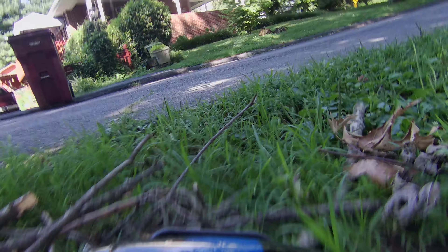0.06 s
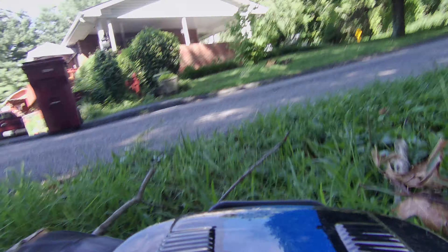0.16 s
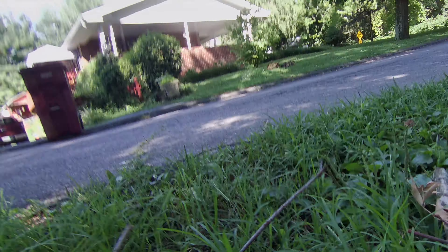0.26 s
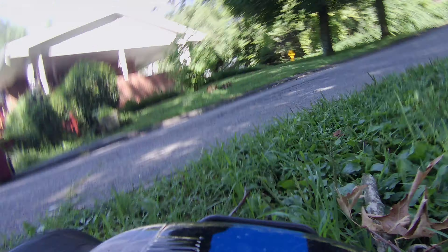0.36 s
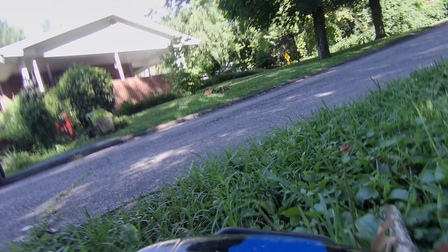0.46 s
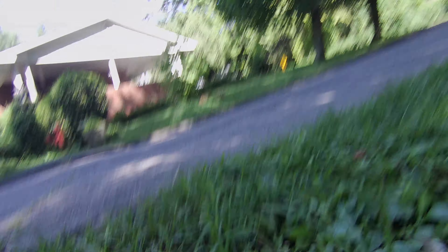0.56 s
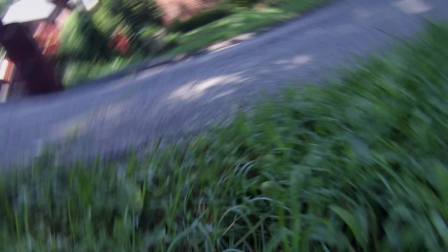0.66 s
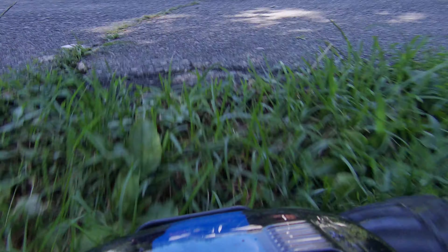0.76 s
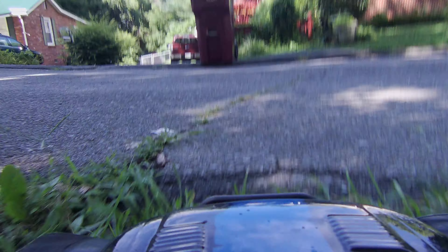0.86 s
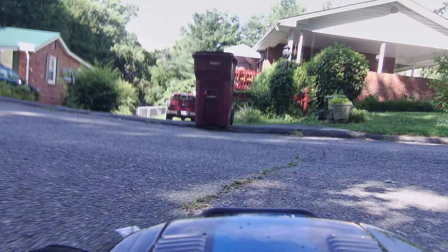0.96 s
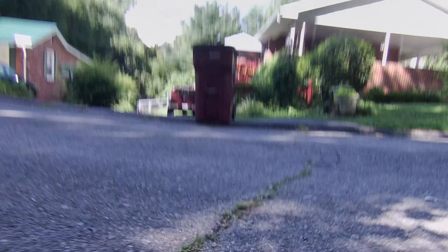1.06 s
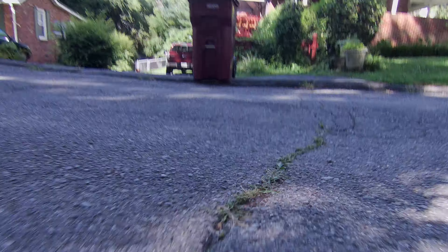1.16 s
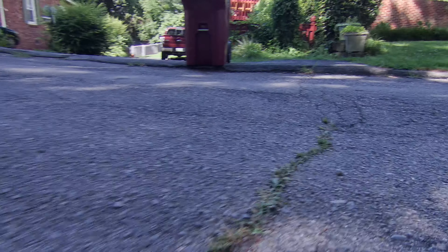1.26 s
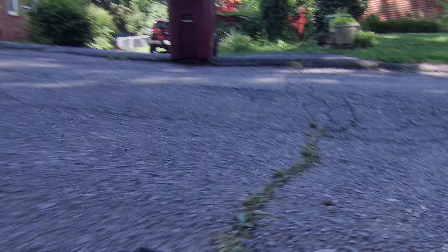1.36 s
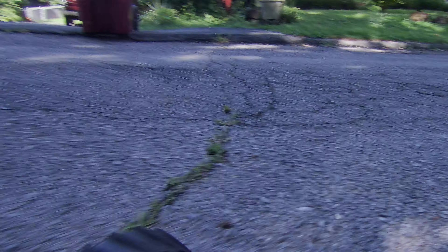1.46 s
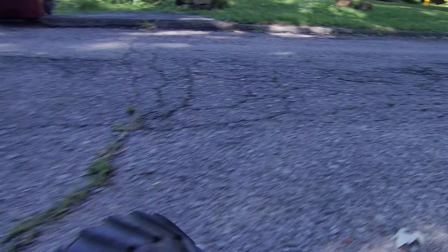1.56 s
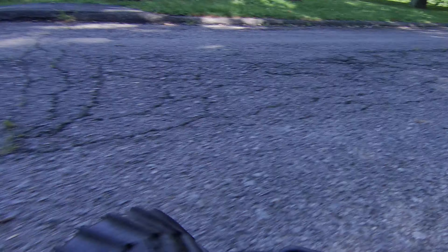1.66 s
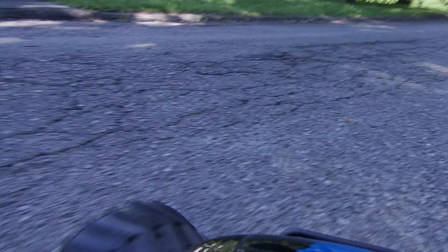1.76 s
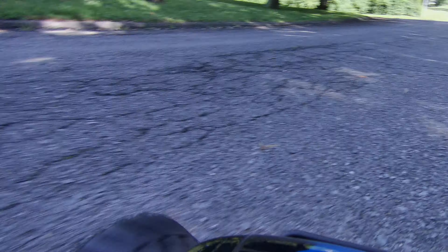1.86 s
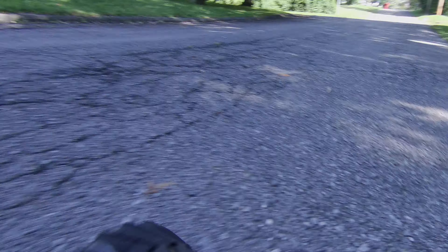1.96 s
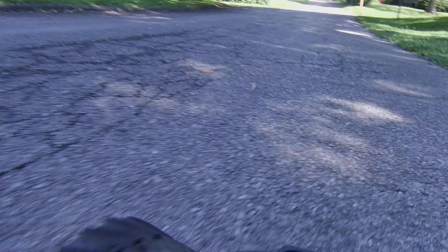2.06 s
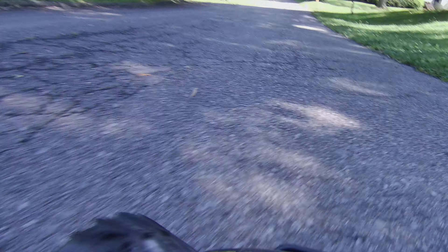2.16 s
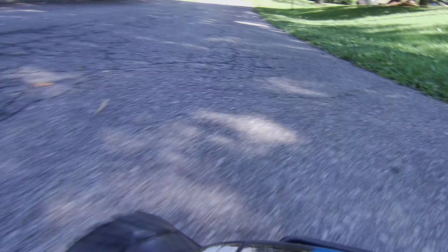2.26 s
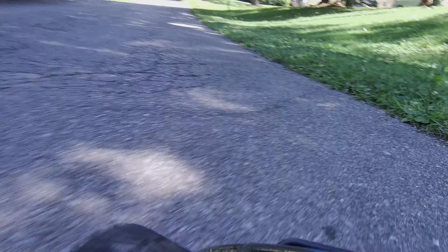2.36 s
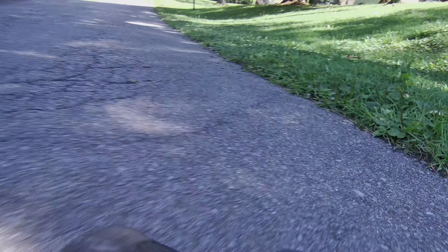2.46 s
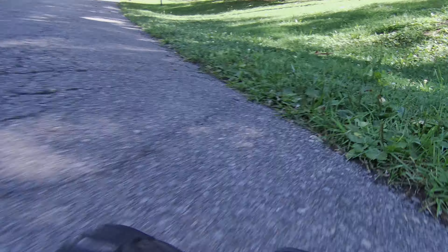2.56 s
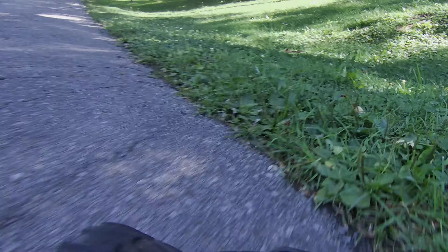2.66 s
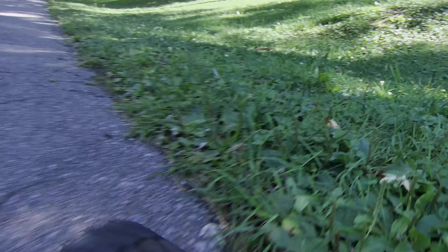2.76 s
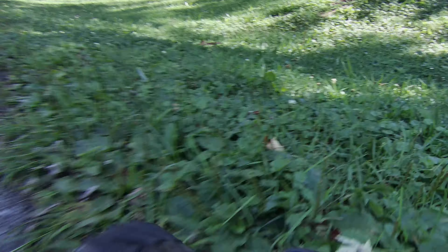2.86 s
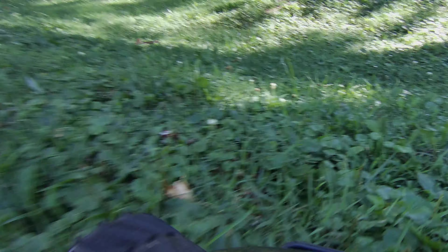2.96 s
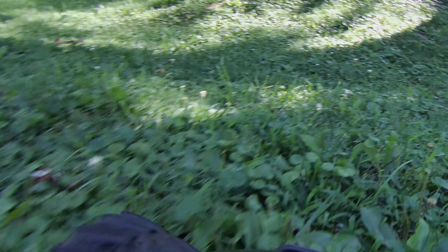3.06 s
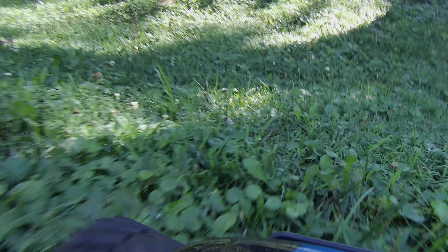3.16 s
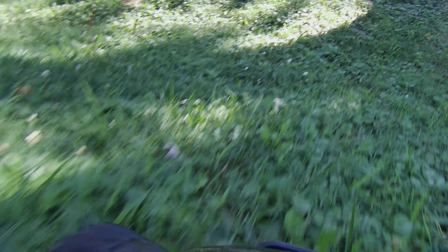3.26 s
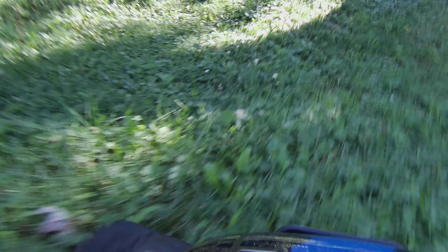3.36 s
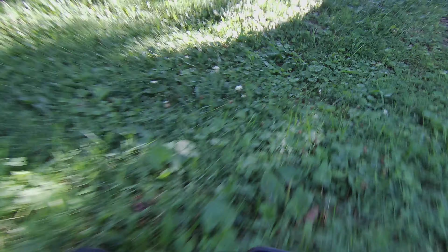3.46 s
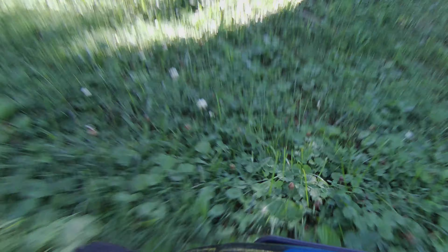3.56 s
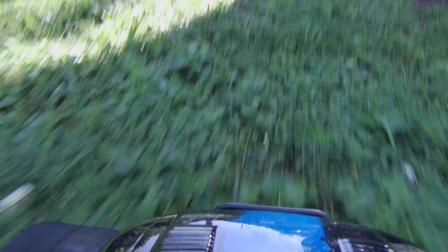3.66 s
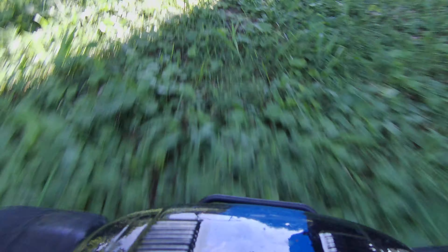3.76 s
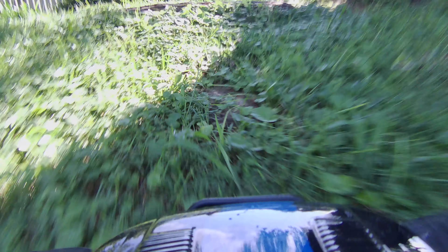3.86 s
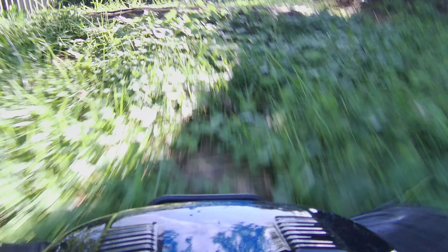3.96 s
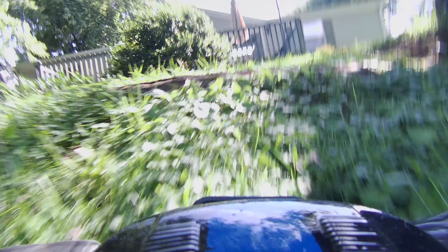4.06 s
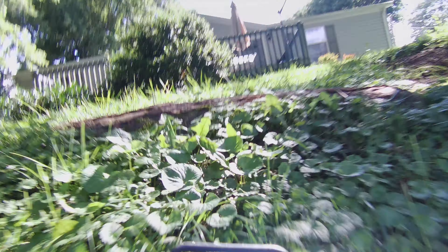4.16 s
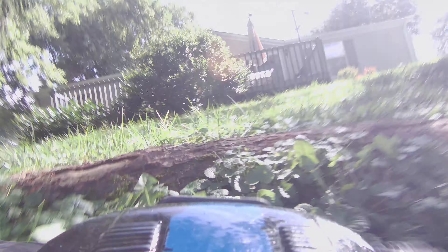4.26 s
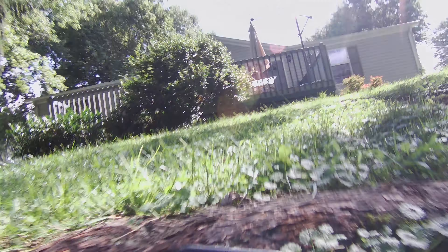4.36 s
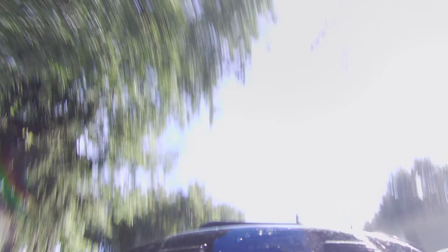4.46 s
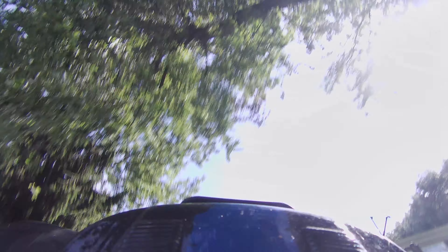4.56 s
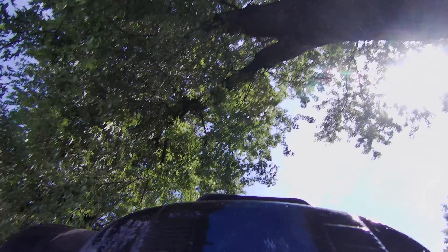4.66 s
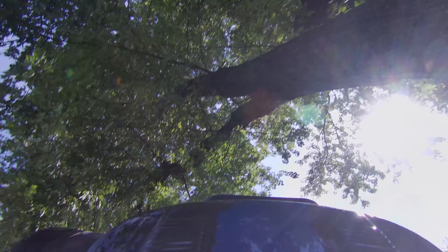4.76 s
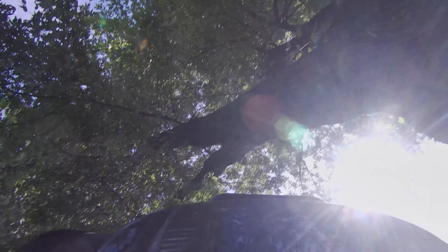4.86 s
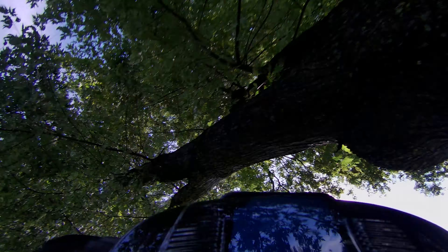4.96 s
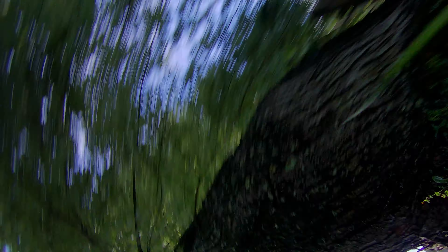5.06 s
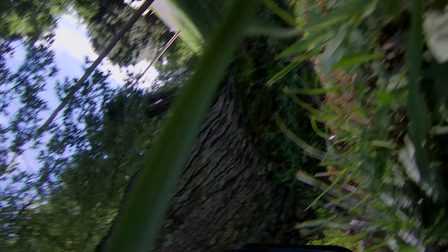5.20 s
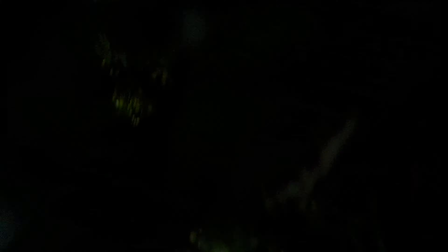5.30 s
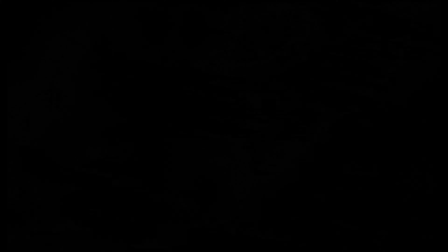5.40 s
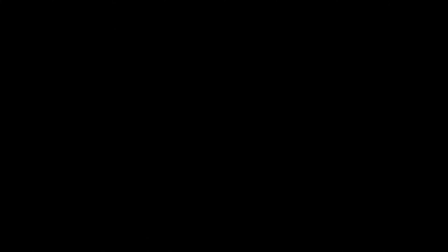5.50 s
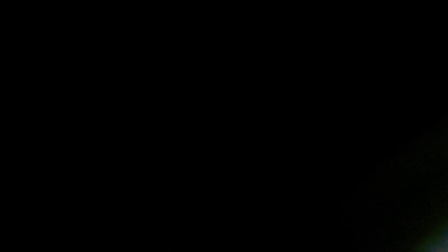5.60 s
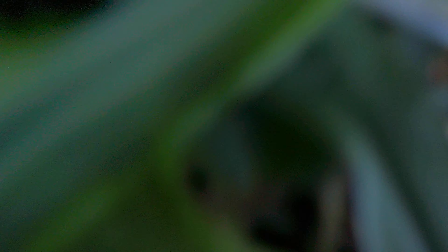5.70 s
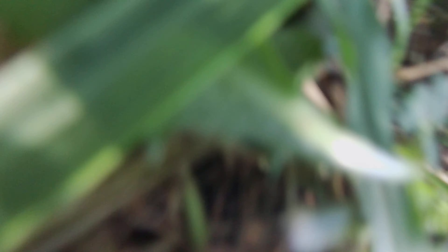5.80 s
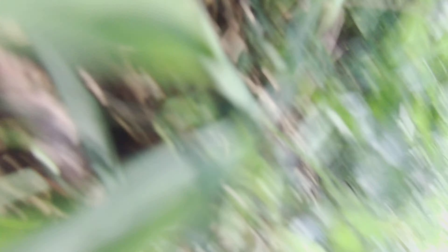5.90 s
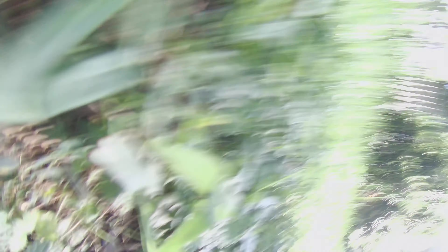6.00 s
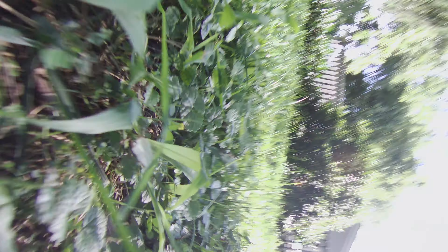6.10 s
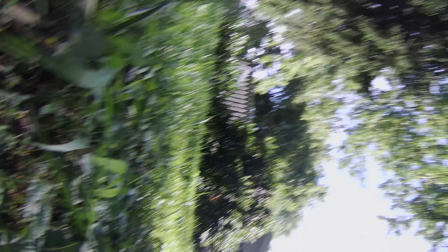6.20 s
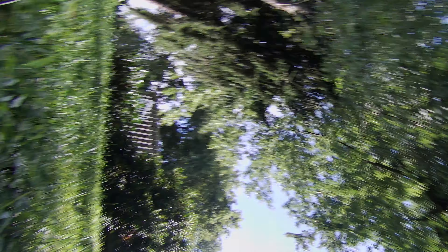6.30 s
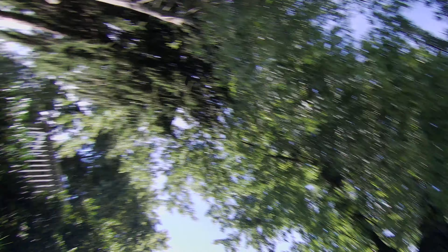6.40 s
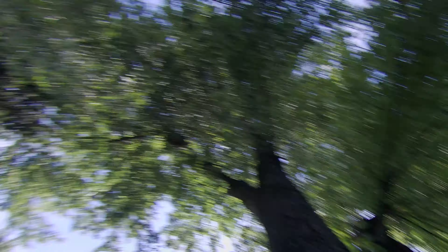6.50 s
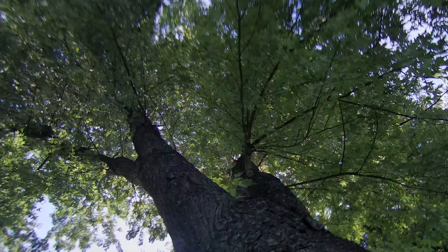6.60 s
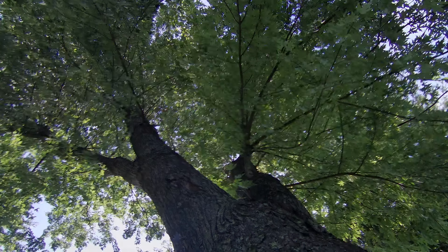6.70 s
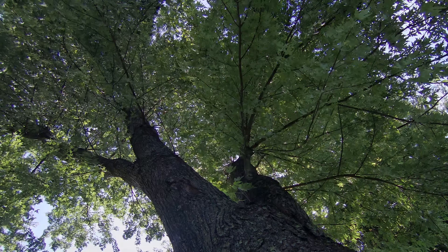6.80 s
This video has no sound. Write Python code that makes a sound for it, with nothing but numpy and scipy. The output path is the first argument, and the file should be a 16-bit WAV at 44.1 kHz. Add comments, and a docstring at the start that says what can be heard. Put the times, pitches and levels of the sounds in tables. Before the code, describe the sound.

Very close, dry sound carried through the plastic chassis of a small radio-controlled truck, with hollow midrange ringing and little bass. From 0 s the gear whine falls and recovers, wobbling, amid buzzing rattle, clacks and short low groans. Knocks crowd in from 0.5 s, with a very hard crack at 0.8 and another at 1.0. On pavement the whine leaps up, then sinks; rattling eases, with a tread hum around 1.5 and light knocks at 1.7. Throttle bursts at 1.8, 2.25 and 3.2 sweep upward into rasp. Over the lawn from 3.4 the motor runs high and rough, with bangs at 3.95, 4.1-4.3 and 4.6. The heaviest crash comes at 5.15-5.25; drive stops near 5.35 with a burst of clatter and grass swish. A knock at 5.5 precedes sparse tumbling thuds, clacks and ticks at 5.8, 5.95, 6.1, 6.25 and 6.65, over near quiet.

```python
"""A small radio-controlled truck races over the ground, bounces and tumbles in the grass, heard from its chassis.
Its loose parts rattle and grass brushes past: random clicks played into the ringing of a plastic case.
The gears whine with a wobbling tone that follows motor speed, and smear into noise when fast.
Bursts of noise make the knocks and ticks; hums, groans, a thin whistle and a faint rumble lie below.
A fast limiter catches the hardest knocks."""
import sys
import numpy as np
from scipy import signal
from scipy.fft import rfft, irfft, next_fast_len
from scipy.io import wavfile
from scipy.ndimage import uniform_filter1d, minimum_filter1d

SR = 44100
rng = np.random.default_rng(int(sys.argv[2]) if len(sys.argv) > 2 else 0)


def unload_wav(signal):
    """Save mono or channel-first audio to the path in sys.argv[1] as 16-bit WAV at rate SR, clipped to [-1, 1]."""
    wavfile.write(
        sys.argv[1],
        SR,
        np.round(np.clip(np.atleast_2d(signal).T, -1, 1) * 32767).astype(np.int16),
    )


N = 301644
T = np.arange(N) / SR


def amp(db):
    """Turns decibels into a gain."""
    return 10 ** (np.asarray(db) / 20)


def unit(x):
    """Scales a sound to an average (rms) level of 1."""
    return x / np.sqrt(np.mean(x ** 2) + 1e-20)


def curves(rows):
    """Joins the points of every table column by straight lines in time."""
    times, *columns = np.transpose(rows)
    return [np.interp(T, times, column) for column in columns]


def add(mix, start, sound):
    """Adds a sound to the mix at a start time in seconds."""
    part = mix[max(round(start * SR), 0):][:len(sound)]
    part += sound[:len(part)]


def wander(hz):
    """Random drift of rms 1 that moves no faster than about hz."""
    size = next_fast_len(N, True)
    f = np.fft.rfftfreq(size, 1 / SR)
    spectrum = rfft(rng.standard_normal(size)) / (1 + (f / hz) ** 4)
    return unit(irfft(spectrum, size)[:N])


def narrow(hz, width_hz):
    """Noise of rms 1 in a narrow band that follows hz."""
    phase = 2 * np.pi * np.cumsum(hz * np.ones(N)) / SR
    return unit(wander(width_hz / 2) * np.cos(phase) + wander(width_hz / 2) * np.sin(phase))


def clicks(per_s, spread_db):
    """A random train of small impacts, a few of them large."""
    size = amp(spread_db * np.minimum(rng.exponential(1, N), 4))
    happens = rng.random(N) < per_s / SR
    return unit(size * rng.choice([-1, 1], N) * happens)


def steady(x, size=1500):
    """Evens out the level over a few hundredths of a second and keeps the faster grain."""
    power = uniform_filter1d(uniform_filter1d(x ** 2, size), size // 2)
    return x / np.sqrt(abs(power) + 1e-9)


def patchy(x, patchy_db):
    """Different parts rattle from moment to moment, so the tone colour keeps shifting."""
    z = signal.stft(x, nperseg=512)[2]
    patches = uniform_filter1d(rng.standard_normal(z.shape), size=5, axis=0)  # smooth in pitch
    patches = unit(uniform_filter1d(patches, size=4, axis=1))  # and in time
    return unit(signal.istft(z * amp(patchy_db * patches), nperseg=512)[1][:N])


def swell(start, length, attack, release):
    """A gain that rises, holds for its length, then dies away; times in seconds."""
    return np.clip((T - start) / attack, 0, 1) * np.exp(-np.maximum(T - start - length, 0) / release)


def swells(rows, attack, release):
    """One gain curve for each level column of a table that starts with (start, length)."""
    return sum(amp(dbs)[:, None] * swell(start, length, attack, release) for start, length, *dbs in rows)


# what chassis and case ring with, or swallow where negative:
# (frequency [Hz], width [Hz], level above the broad shape [dB])
CASE_RESONANCES = [(338, 155, -5.5), (583.4, 38, 6.5), (708, 85, 6), (910, 9.7, 1), (1119, 16, 6),
                   (1402.5, 46, -22.5), (1432, 74, 12), (2550, 120, 5), (2920, 350, 1), (3440, 590, 1),
                   (5450, 680, 6), (7300, 950, 6.5), (10400, 3400, 2)]


def case(shape, size=4096):
    """The ringing after one tap, of energy 1: a broad shape with the resonances of the case on it."""
    f = np.fft.rfftfreq(size, 1 / SR)
    hz, db = np.transpose(shape)
    db = np.interp(np.log(f + 1), np.log(hz), db)
    db = db + sum(peak_db / (1 + (2 * (f - center) / width) ** 2) for center, width, peak_db in CASE_RESONANCES)
    log_gain = np.log(amp(np.r_[db, db[-2:0:-1]]))
    # minimum phase: the ring starts at once, with nothing before the tap
    ring = np.fft.ifft(np.exp(np.conj(signal.hilbert(log_gain)))).real[:size // 2]
    return ring / np.linalg.norm(ring)


def through(x, ring):
    """Plays a sound into the ringing of a body."""
    return signal.oaconvolve(x, ring)[:len(x)]


def strike(ring, length, evenness, punch=0.16, size=4096):
    """A burst of contact chatter: a hard first contact, an even ring for its length, then it dies away."""
    t = np.arange(size) / SR
    sound = unit(through(rng.standard_normal(2 * size), ring)[size:])
    power = uniform_filter1d(abs(signal.hilbert(sound)) ** 2, size=30)
    loudness = np.sqrt(abs(power) + 1e-6)
    hold = (1 - np.exp(-t / .0003)) / np.sqrt(1 + (t / length) ** 6)
    first_contact = (1 + punch * np.exp(-3 * t / length)) / (1 + punch / 3)
    return unit(sound / loudness ** np.clip(evenness, 0, 1)) * hold * first_contact


# how hard the ground shakes the rolling chassis: (time [s], level [dB])
GROUND_SHAKING = [(0, -19), (.78, -21), (.84, -21.5), (1.16, -25), (1.46, -22.5), (1.58, -20), (1.8, -27.5),
                  (1.88, -17.5), (2.1, -22), (2.55, -22), (3.1, -24.5), (3.19, -26.5), (3.3, -28),
                  (3.6, -19.5), (4.3, -25), (4.7, -19.5), (4.86, -26), (5.14, -19), (5.35, -23),
                  (5.68, -36), (6.4, -31.5), (6.47, -46.5), (6.63, -43.5), (6.83, -33)]
# bursts of throttle; rasp and wheel-spin hiss are as at the gearbox resonance and grow with motor speed:
# (start [s], length [s], gear whine [dB], gear rasp [dB], wheel-spin hiss [dB])
THROTTLE_BURSTS = [(-.03, 0.89, -25.5, -30, -43.5), (0.862, 0.23, -31.5, -37, -55.5),
                   (1.828, 0.14, -22, -34.5, -54), (2.239, 0.25, -23.5, -34, -50),
                   (3.21, 0.18, -22, -34, -51), (3.384, 1.32, -29, -37, -53.5),
                   (4.718, 0.63, -38, -42, -58.5)]
# bouts of rattling as the truck bounces, then rolls over in the grass:
# (start [s], length [s], shaking [dB], rasp [dB], grass swish [dB])
BOUNCES = [(.13, 0.16, -16, -27.5, -50), (.39, 0.2, -18.5, -34, -52), (1.18, 0.037, -21.5, -34, -52),
           (1.34, 0.042, -35, -43, -57), (1.832, 0.033, -23, -49, -53), (1.995, .025, -21, -29.5, -49),
           (3.235, 0.056, -21.5, -42, -53), (3.0, .14, -24.5, -52, -60), (3.48, 0.076, -18, -37, -49),
           (3.64, .06, -36, -38, -46), (4.35, .05, -20.5, -33, -53), (4.455, 0.086, -17.5, -34, -50),
           (4.93, 0.056, -20.5, -50, -58), (5.364, 0.059, -15, -28.5, -38), (5.44, 0.25, -36, -46, -49.5),
           (5.715, .13, -26, -39, -40), (5.85, 0.082, -30, -40, -50.5), (5.99, 0.085, -20, -36, -61),
           (6.12, 0.069, -20, -35, -71), (6.26, 0.13, -22.5, -43.5, -66), (6.67, .13, -24.5, -35.5, -69)]
THROTTLE_ATTACK_S, THROTTLE_RELEASE_S = 0.0097, 0.012
BOUNCE_ATTACK_S, BOUNCE_RELEASE_S = 0.0074, 0.019
THROTTLE_SHAKE_DB, THROTTLE_DB_PER_OCTAVE = 2.5, 4
# levels relative to the ground shaking, and the hiss that never stops
RASP_RE_SHAKE_DB, SWISH_RE_SHAKE_DB, COAST_WHINE_RE_SHAKE_DB, STILL_HISS_DB = -22, -44.5, -20.5, -67


def effort():
    """Throttle (about 0 to 1) and the gains that ground, throttle and bounces give to each sound."""
    ground = amp(curves(GROUND_SHAKING)[0])
    throttle = sum(swell(start, length, THROTTLE_ATTACK_S, THROTTLE_RELEASE_S)
                   for start, length, *_ in THROTTLE_BURSTS)
    drive_whine, drive_rasp, wheel_spin = swells(THROTTLE_BURSTS, THROTTLE_ATTACK_S, THROTTLE_RELEASE_S)
    bounce_shake, bounce_rasp, grass = swells(BOUNCES, BOUNCE_ATTACK_S, BOUNCE_RELEASE_S)
    speed = amp(THROTTLE_DB_PER_OCTAVE * np.log2(curves(MESH_SPEED)[0] / GEARBOX_HZ))
    # independent sounds add by their power
    shake = np.hypot(ground * amp(THROTTLE_SHAKE_DB * throttle), bounce_shake)
    rasp = np.linalg.norm([ground * amp(RASP_RE_SHAKE_DB), drive_rasp * speed, bounce_rasp], axis=0)
    swish = np.linalg.norm([ground * amp(SWISH_RE_SHAKE_DB), wheel_spin * speed, grass], axis=0)
    swish = np.hypot(swish, amp(STILL_HISS_DB))
    whine = np.hypot(ground * amp(COAST_WHINE_RE_SHAKE_DB), drive_whine)
    return throttle, shake, rasp, swish, whine


# broad tone of the chattering loose parts: (frequency [Hz], relative level per Hz [dB])
SHAKE_TONE = [(25, -86), (80, -52), (160, -23), (250, -15.5), (400, -6), (620, -1.5), (850, 3.5), (1200, 1),
              (1500, -7), (1850, -13.5), (2200, -19), (4000, -38.5), (8000, -55)]
# broad tone of gear rasp and hard clacks: (frequency [Hz], relative level per Hz [dB])
RASP_TONE = [(300, -44.5), (1200, 18), (1800, -8.5), (2100, 7.5), (2700, 4), (3600, 3.5), (4400, -15.5),
             (6000, -23.5), (16000, -53)]
# broad tone of grass swish and sharp snaps: (frequency [Hz], relative level per Hz [dB])
SWISH_TONE = [(1000, -18), (3500, -1), (4800, 1.5), (6300, -3), (8000, 0.5), (11500, 2), (14000, -2.5),
              (16000, 0.5)]


def running(shake_gain, rasp_gain, swish_gain):
    """Loose parts chatter, gear teeth rasp and blades of grass flick the case, all jolted together."""
    unbalance_hz = 71 * (1 + .03 * wander(4))
    unbalance_db = 1.9 * np.cos(2 * np.pi * np.cumsum(unbalance_hz) / SR)
    jolt = amp(1.64 * wander(44) + unbalance_db)
    parts = clicks(per_s=2400, spread_db=1.0)
    grit = clicks(per_s=450, spread_db=2.7)
    blades = clicks(per_s=6000, spread_db=5.5)
    shake = through(parts * jolt, case(SHAKE_TONE))
    rasp = through((parts + grit) * jolt, case(RASP_TONE))
    swish = through((0.12 * parts + blades) * jolt, case(SWISH_TONE))
    shake = patchy(steady(shake), patchy_db=2) * shake_gain
    rasp = patchy(steady(rasp), patchy_db=2.5) * rasp_gain
    swish = patchy(steady(swish), patchy_db=4.5) * swish_gain
    return shake + rasp + swish


# the gearbox rings when the whine crosses its resonance, and passes less and less above it
GEARBOX_HZ, GEARBOX_WIDTH_HZ, GEARBOX_DB, GEARBOX_DB_PER_OCTAVE = 1146, 200, 12, -9.5


def gearbox_db(hz):
    """How well the gearbox passes a tone."""
    ring_db = GEARBOX_DB / (1 + (2 * (hz - GEARBOX_HZ) / GEARBOX_WIDTH_HZ) ** 2)
    return ring_db + GEARBOX_DB_PER_OCTAVE * np.log2(np.maximum(hz / GEARBOX_HZ, 1))


# motor speed, as the rate at which gear teeth meet: (time [s], gear mesh frequency [Hz])
MESH_SPEED = [(0, 1403), (.06, 976), (.25, 653), (.35, 342.4), (.39, 625), (.5, 747), (.84, 627),
              (.93, 1058), (1.05, 1950), (1.3, 1211), (1.83, 937), (1.89, 1050), (1.925, 1300),
              (1.975, 2100), (2.24, 963), (2.31, 970), (2.37, 1240), (2.43, 1820), (2.7, 1200),
              (3.24, 1031), (3.33, 1165), (3.39, 1500), (3.8, 1880), (4.2, 1817), (4.5, 1229), (4.61, 2100),
              (4.69, 1947), (4.84, 2460), (5.15, 2150), (5.5, 1313), (6.8, 718)]
# overtones of the mesh tone, before gearbox and speed act on them:
# (multiple [times mesh frequency], clean tone [dB], smeared rasp [dB])
MESH_OVERTONES = [(1, 0, -8), (2, -11, -11)]


def gears(gain):
    """Meeting teeth make a fluttering tone, nearly pure at low speed and smeared into a rasp at high speed."""
    mesh_hz = curves(MESH_SPEED)[0]
    slap = (mesh_hz / 1200) ** 2  # fast teeth bounce on each other
    flutter = .016 * wander(45) + .017 * slap * wander(260)  # the load varies
    turns = np.cumsum(mesh_hz * (1 + flutter)) / SR  # counted in teeth
    teeth = 13
    wobble = 1 + 0.26 * np.cos(2 * np.pi * turns / teeth)  # once each turn of the motor
    tone = np.zeros(N)
    for k, clean_db, rasp_db in MESH_OVERTONES:
        clean = amp(clean_db) * unit(np.sin(2 * np.pi * k * turns))
        smeared = amp(rasp_db) * slap * narrow(k * mesh_hz, width_hz=k * 280)
        tone += (clean + smeared) * amp(gearbox_db(k * mesh_hz))
    # the gearbox muffles the top
    tone = signal.sosfilt(signal.butter(6, 3700, fs=SR, output="sos"), tone)
    grip_db = 2.8 * wander(56) + 1.5 * wander(22)  # the wheels bite and slip
    return tone * unit(wobble * amp(grip_db)) * gain


# hard knocks on the chassis:
# (time [s], level [dB], length [s], ring [Hz], thump relative to level [dB], crack relative to level [dB])
KNOCKS = [(0.535, -17, .004, 810, -49, -35), (.686, -15.5, 0.015, 810, -40, -30),
          (0.709, -11, .016, 850, -51, -20), (.76, -12, 0.0097, 970, -42, -38),
          (.774, -7.5, 0.0057, 1150, -46, -9), (0.813, 1.5, 0.0056, 983, -41, -13.5),
          (.997, -6.5, 0.02, 985.3, -30.5, -15.5), (1.255, -12.5, 0.015, 982, -41, -13),
          (1.696, -13, 0.013, 750, -50, -49), (1.714, -20, 0.015, 735, -52, -38),
          (3.417, -13, 0.0081, 795, -45, -28), (3.941, -2, 0.004, 1046, -55, -24),
          (3.969, -14, .015, 862, -50, -19.5), (4.115, -16.5, 0.013, 1087, -17, -13),
          (4.128, 0, 0.0021, 996, -25, -24), (4.17, -2.5, .0059, 1060, -50, -14),
          (4.258, -11.5, 0.019, 920, -29, -23), (4.393, -12.5, 0.0027, 880, -51, -22),
          (4.461, -15, 0.01, 903, -42, -34), (4.521, -10.5, 0.032, 1123, -28, -14.5),
          (4.599, -4.5, .004, 1045, -52, -25.5), (4.649, -15, 0.021, 960, -47, -32),
          (4.694, -13, 0.008, 714, -51, -22), (5.16, -8.5, 0.021, 1270, -45, -8),
          (5.184, 2.5, .019, 1050, -49, -19.5), (5.228, -4, 0.021, 960, -47, -15),
          (5.507, -5, 0.0036, 825, -17, -19), (5.775, -12, 0.027, 830, -45, -36),
          (5.808, -12.5, 0.017, 820, -38, -23), (5.933, -6.5, 0.015, 345, -20.5, -26),
          (5.944, -16, 0.033, 595, -24, -25), (6.088, -13, 0.0083, 840, -37, -15.5),
          (6.241, -17.5, 0.028, 282, -21, -23), (6.243, -12.5, 0.018, 883, -36, -40),
          (6.647, -11, 0.035, 840, -29.5, -22), (6.787, -17, 0.012, 1153, -49, -20.5)]
# broad tone of the blow itself: (frequency [Hz], relative level per Hz [dB])
BLOW_TONE = [(25, -62), (120, -54.5), (250, -8.5), (450, -7), (700, -4), (980, -2), (1300, -4),
             (1600, -8.5), (2100, -19), (4000, -37.5), (8000, -63)]
# broad tone of the low thump: (frequency [Hz], relative level per Hz [dB])
THUMP_TONE = [(15, -3), (40, -6), (120, -6.5), (200, 0.5), (400, -2), (1500, -34)]
# broad tone of the bright crack: (frequency [Hz], relative level per Hz [dB])
CRACK_TONE = [(600, -30), (2000, 3.5), (3500, 5), (4500, -10.5), (7000, -16), (12000, -19.5), (16000, -26)]


def knocks():
    """The chassis hits the ground: each blow rings its own part of the case, with a thump and a crack."""
    high, low = np.zeros(N), np.zeros(N)
    blow, thump, crack = case(BLOW_TONE), case(THUMP_TONE), case(CRACK_TONE)
    t = np.arange(len(blow)) / SR
    for start, db, length, hz, thump_db, crack_db in KNOCKS:
        mode = np.exp(-t / 0.0021) * np.cos(2 * np.pi * hz * t)
        ring = unit(through(blow, mode)) + .5 * unit(blow)
        add(high, start, amp(db) * strike(ring, length, evenness=0.68))
        add(high, start, amp(db + crack_db) * strike(crack, length, evenness=0.53, punch=5.0))
        # the whole chassis is shoved once, then shudders
        push = 0.68 * np.sqrt(length * SR) * thump
        shudder = 0.74 * strike(thump, length, evenness=0.46)
        add(low, start, amp(db + thump_db) * push)
        add(low, start, amp(db + thump_db) * shudder)
    # the ring and crack stay clear of the bass; only the thump carries the low end
    return signal.sosfilt(signal.butter(2, 230, "highpass", fs=SR, output="sos"), high) + low


# the sharpest stalks and grit that strike the case: (time [s], clack [dB], snap [dB])
SHARP_TICKS = [(0.149, -19, -42), (0.324, -41, -29), (.427, -42, -32), (1.386, -26.5, -47),
               (1.585, -27, -37), (2.672, -22, -41.5), (3.081, -28.5, -44), (4.154, -15, -49),
               (4.858, -44, -37), (5.411, -13, -44), (5.422, -24, -41), (5.649, -36, -35),
               (5.713, -31, -31), (5.893, -28, -37), (6.005, -28, -39), (6.033, -23, -33.5),
               (6.06, -33, -34), (6.132, -32, -53), (6.157, -16.5, -45), (6.188, -26, -36),
               (6.299, -26, -35), (6.397, -24, -44), (6.731, -29, -43)]
# lighter ones fall at random, scaled by the shaking
STRAY_COUNT, STRAY_CLACK_DB, STRAY_SNAP_DB, STRAY_SPREAD_DB = 40, -6.5, -25.5, 1.5


def ticks(shake):
    """Stalks and grit snap against the plastic; the stray ones hit harder when the ride is rough."""
    out, clack, snap = np.zeros(N), case(RASP_TONE), case(SWISH_TONE)
    length = .0025  # seconds
    at = rng.integers(0, N, size=STRAY_COUNT)
    force_db = 20 * np.log10(shake[at]) + STRAY_SPREAD_DB * rng.standard_normal(len(at))
    strays = [(start, db + STRAY_CLACK_DB, db + STRAY_SNAP_DB) for start, db in zip(T[at], force_db)]
    for start, clack_db, snap_db in [*SHARP_TICKS, *strays]:
        hard = amp(clack_db) * strike(clack, length, evenness=1.0)
        sharp = amp(snap_db) * strike(snap, length, evenness=.3)
        add(out, start, hard + sharp)
    return out


# hums of the tread, the coasting gearbox and the hollow shell:
# (start [s], length [s], frequency [Hz], level [dB])
HUMS = [(1.512, .23, 747, -23), (2.402, 0.053, 775, -19), (2.527, 0.52, 437, -36), (2.715, 0.21, 1146, -25),
        (3.15, 1.05, 765, -24.5), (4.245, 1.03, 724.4, -28), (5.61, .28, 633, -33)]
DRONE_ATTACK_S, DRONE_RELEASE_S = 0.017, .04


def drone():
    """Tread, gearbox and hollow shell hum: narrow bands of noise with an uneven level."""
    hums = np.zeros(N)
    for start, length, hz, db in HUMS:
        hum = steady(narrow(hz, width_hz=105))
        hums += hum * amp(db) * swell(start, length, DRONE_ATTACK_S, DRONE_RELEASE_S)
    return hums * amp(2 * wander(22))


# short low groans of the straining chassis:
# (start [s], length [s], first frequency [Hz], last frequency [Hz], level [dB])
GROAN_GLIDES = [(0.048, 0.16, 318, 364, -32.5), (0.541, 0.022, 396, 328, -28.5),
                (.645, 0.054, 325, 360, -30.5), (0.831, 0.024, 232, 273, -37)]


def groans():
    """The straining chassis groans: short, low tones that glide in pitch and waver in level."""
    out = np.zeros(N)
    for start, length, from_hz, to_hz, db in GROAN_GLIDES:
        hz = np.linspace(from_hz, to_hz, int(length * SR))
        tone = np.sin(2 * np.pi * np.cumsum(hz) / SR)
        add(out, start, amp(db) * unit(tone * signal.windows.tukey(len(hz), .6)))
    return out * amp(4.0 * wander(74))


CONTROLLER_HZ, WHISTLE_DB, ROTOR_DB, ROTOR_RE_SHAKE_DB = 7988, -67, -73.5, -46
WHISTLE_KICK_DB, WHISTLE_KICK_S = -64, .04  # an extra push as the throttle opens, and its fade


def controller(throttle, shake):
    """The speed controller sings in the motor under throttle, beside a thin hiss of the spinning rotor."""
    whistle = unit(np.sin(2 * np.pi * CONTROLLER_HZ * T) * (1 + .5 * wander(40)))
    kicks = sum(swell(start, 0, THROTTLE_ATTACK_S, WHISTLE_KICK_S) for start, *_ in THROTTLE_BURSTS)
    whistle_gain = throttle * amp(WHISTLE_DB) + kicks * amp(WHISTLE_KICK_DB)
    rotor_gain = throttle * amp(ROTOR_DB) + shake * amp(ROTOR_RE_SHAKE_DB)
    return whistle * whistle_gain + narrow(10950, width_hz=800) * rotor_gain


# broad tone of the shell buffeted by the ride: (frequency [Hz], relative level per Hz [dB])
RUMBLE_TONE = [(15, -18), (40, -20), (80, 0), (130, 10), (250, -15), (1000, -49)]
RUMBLE_DB = -65.5


def rumble(shake):
    """The buffeted shell gives a faint low rumble: noise that swells with the shaking."""
    noise = through(rng.standard_normal(N), case(RUMBLE_TONE))
    return unit(noise * np.sqrt(shake)) * amp(RUMBLE_DB)


def scene():
    """Every sound arrives through the chassis, so there is no room echo."""
    throttle, shake, rasp, swish, whine = effort()
    rattle = running(shake, rasp, swish)
    drivetrain = gears(whine) + controller(throttle, shake)
    impacts = knocks() + ticks(shake)
    mix = rattle + drivetrain + impacts + drone() + groans() + rumble(shake)
    return mix[None]


EDGE_HZ = 16150


def record(dry):
    """A fast limiter holds the peaks and recovers within hundredths of a second; then the top is cut off."""
    ceiling_db, recover_db_per_s = -3.2, 170
    over_db = np.maximum(20 * np.log10(abs(dry[0]) + 1e-9) - ceiling_db, 0)
    fall = T * recover_db_per_s
    held_db = np.maximum.accumulate(over_db + fall) - fall
    gain = uniform_filter1d(minimum_filter1d(amp(-held_db), size=41), size=41)
    low_pass = signal.firwin(511, EDGE_HZ, window=("kaiser", 9), fs=SR)
    return signal.oaconvolve(dry * gain, low_pass[None], "same")


dry = scene()
out = record(dry)
unload_wav(out)
```